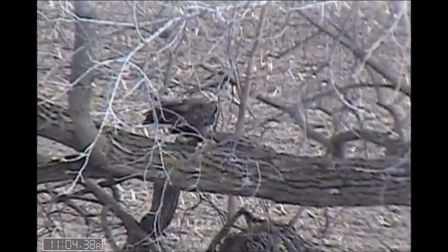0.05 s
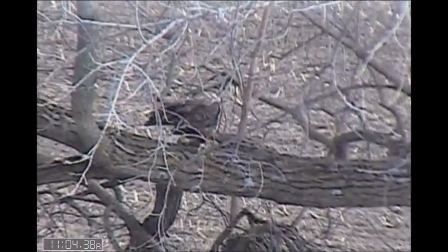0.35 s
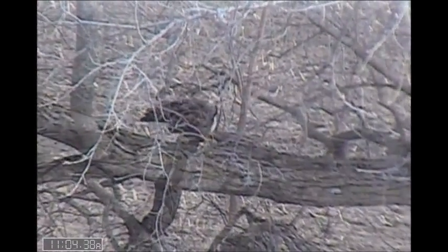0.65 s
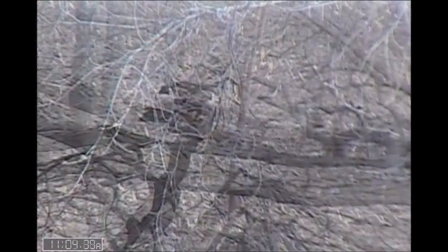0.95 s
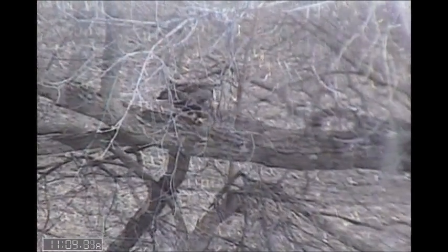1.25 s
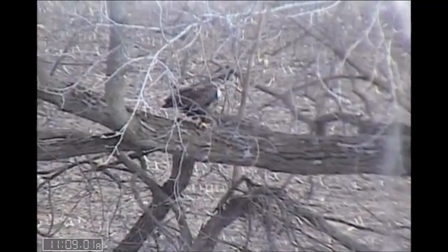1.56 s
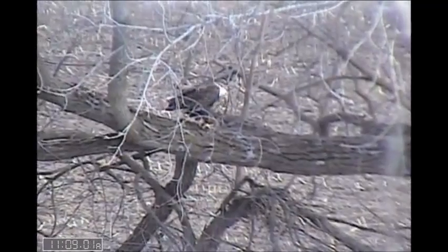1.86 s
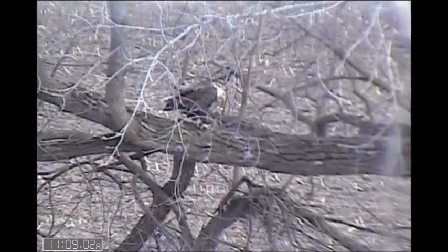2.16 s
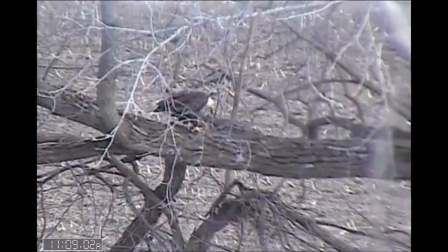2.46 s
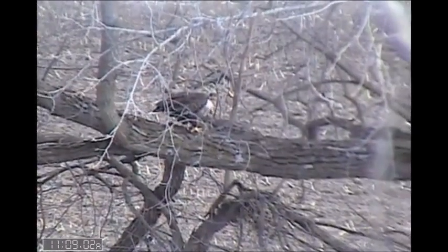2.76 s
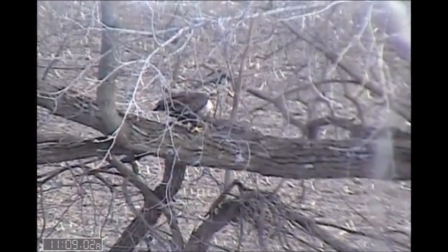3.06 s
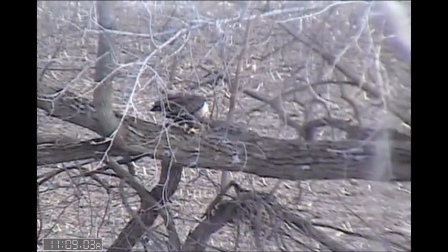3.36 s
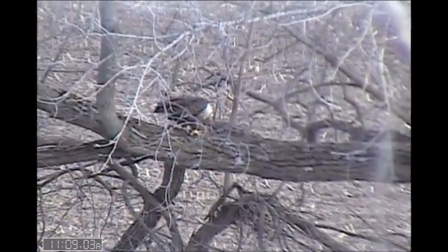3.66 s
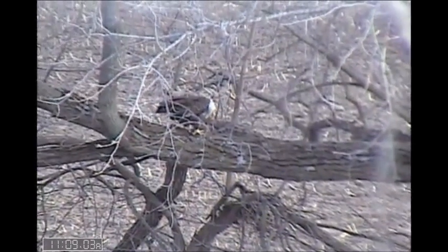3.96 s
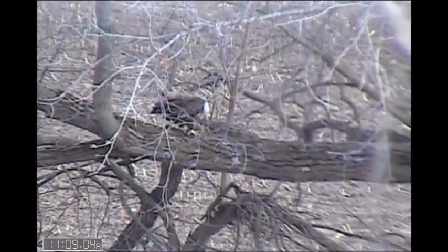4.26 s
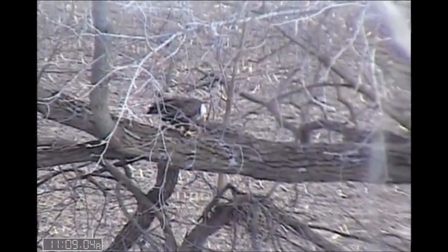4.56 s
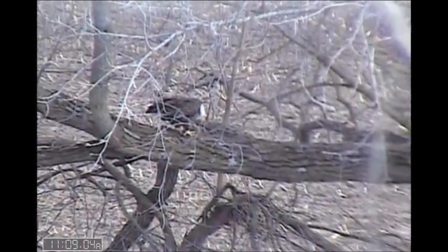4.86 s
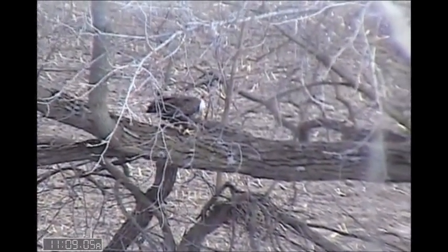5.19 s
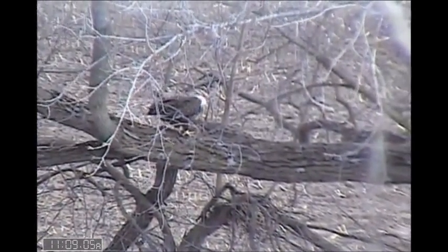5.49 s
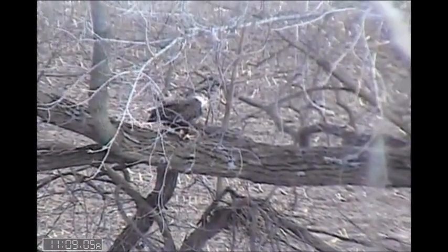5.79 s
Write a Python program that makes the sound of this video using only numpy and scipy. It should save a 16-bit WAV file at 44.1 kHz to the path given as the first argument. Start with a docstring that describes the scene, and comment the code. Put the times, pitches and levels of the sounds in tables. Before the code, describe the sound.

Wind rushes dully past a camera microphone in bare woods, swelling and easing in gusts over a low rumble. Tape hiss and two thin, very high whistles lie underneath and drop in level early on. Dry woody ticks and a few soft thumps come at odd moments. In the second half the wind briefly sags and sputters between gusts, while a fine crackle gathers on the left.

```python
"""Wind in bare woods

Wind rushes dully past a camcorder's microphone: each gust swells its roar and thins the low rush beneath. Tape
hiss and two thin, high whistles lie under it and step down early on. Dry ticks come at odd moments. Later the
wind sputters between gusts and a fine crackle gathers on the left."""
import sys
import numpy as np
from scipy import signal
from scipy.fft import rfft, irfft, next_fast_len
from scipy.io import wavfile
from scipy.ndimage import uniform_filter1d

SR = 44100
rng = np.random.default_rng(int(sys.argv[2]) if len(sys.argv) > 2 else 0)


def materialize(psi):
    """Save the field psi as 16-bit PCM at rate SR to the path in sys.argv[1].

    A 1-D psi becomes a single channel; in a 2-D psi each row is a channel.
    """
    bounded = np.clip(np.atleast_2d(psi).T, -1, 1)
    quanta = np.round(bounded * 32767).astype(np.int16)
    wavfile.write(sys.argv[1], SR, quanta)


N = 265909
TIME_S = np.arange(N) / SR


def amp(db):
    """Turn decibels into a gain to multiply by."""
    return 10 ** (np.asarray(db) / 20)


def over_hz(rows, hz):
    """Read each column of a table at the given pitches, blending between rows."""
    row_hz, *columns = np.transpose(rows)
    return [np.interp(np.log(hz + 1), np.log(row_hz + 1), column) for column in columns]


def over_time(rows, t):
    """Read each column of a table at the given times, blending between rows."""
    row_s, *columns = np.transpose(rows)
    return [np.interp(t, row_s, column) for column in columns]


def wander(rate_hz, stride=32):
    """A smooth random wobble of about size 1, no faster than about rate_hz."""
    coarse = np.arange(next_fast_len(N // stride + 2)) * stride
    hz = np.fft.rfftfreq(len(coarse), stride / SR)
    spectrum = rfft(rng.standard_normal(len(coarse)))
    wobble = irfft(spectrum / (1 + (hz / rate_hz) ** 4), len(coarse))
    return np.interp(np.arange(N), coarse, wobble / wobble.std())


def stereo_noise(loudness_db, stereo):
    """Noise shaped by loudness_db(hz, t) and spread between left and right by a stereo table."""
    frames = dict(fs=SR, nperseg=1024, noverlap=768)
    white = rng.standard_normal((2, N)) * np.sqrt(SR / 2)
    hz, t, (shared, separate) = signal.stft(white, **frames)
    balance_db, likeness, lead_rad = over_hz(stereo, hz[:, None])
    left = shared * amp(balance_db)
    right = (likeness * shared + np.sqrt(1 - likeness ** 2) * separate) * np.exp(1j * lead_rad)
    pair = np.array([left, right]) / np.sqrt((1 + amp(balance_db) ** 2) / 2)
    return signal.istft(pair * amp(loudness_db(hz[:, None], t)), **frames)[1][:, :N]


def early(step_s=1.777, fade_s=0.023):
    """1 before the hiss, whistles and crackle step down, 0 afterwards."""
    return np.clip(.5 + (step_s - TIME_S) / fade_s, 0, 1)


def snap(clicks, relax_hz, soft_hz):
    """Turn each click into a sudden jump that quickly dies away."""
    hold, soft = np.exp(-2 * np.pi * np.array([relax_hz, soft_hz]) / SR)
    jumps = signal.lfilter([1], [1, -hold], clicks)
    return signal.lfilter([1 - soft], [1, -soft], jumps)


def soft_pulse(clicks, hz, half_s, balance_db):
    """Turn each click into a soft, low pulse a few cycles long."""
    t = np.arange(-600, 601) / SR
    shape = np.exp(-(t / half_s) ** 2) * np.cos(2 * np.pi * hz * t)
    return np.outer(amp([balance_db / 2, -balance_db / 2]), signal.oaconvolve(clicks, shape, "same"))


# The tone of the hiss: pitch_hz, level_db
HISS_TONE = [(300, -81), (1500, -85.5), (2500, -91.5), (4000, -88), (7000, -88), (10500, -88), (12500, -90),
             (15500, -95)]
# Where the hiss sits: pitch_hz, left_over_right_db, likeness (0 to 1), right_lead_rad
HISS_STEREO = [(1500, 14.5, 0, 0.9), (2460, 12, 0, 3.6), (3930, 6.5, 0.97, 4.31), (7000, 4.5, 0.6, 3.4),
               (15000, 3.5, 0.77, 3)]


def tape_hiss(level_db=-0.37, early_db=7, flicker_db=1.25):
    """Tape makes a fine hiss that flickers slightly and is louder at first."""
    noise = stereo_noise(lambda hz, t: over_hz(HISS_TONE, hz)[0], HISS_STEREO)
    return noise * amp(level_db + early_db * early() + flicker_db * wander(24))


# The lower whistle, then the upper: early_boost_db, left_over_right_db, flutter_db, throb_db
WHISTLE_TRAITS = [(4, 8, 2, 3), (7.5, 9, 3.5, 3)]
# Their slow swells: time_s, lower_db, upper_db
WHISTLE_SWELLS = [(0, -65, -65.5), (.35, -58.5, -63.5), (.6, -64, -64.5), (.9, -57, -64.5),
                  (1.3, -55.5, -65.5), (1.7, -60, -61), (2.05, -56, -61.5), (2.5, -60, -62),
                  (3.05, -57, -63), (3.55, -64, -72), (4.15, -59, -68), (4.5, -64, -69.5), (5.0, -62, -65),
                  (5.4, -62, -63), (6.03, -66, -68)]


def whistles(pitches_hz=(11181, 15734), drift_hz=1.0, throb_hz=10):
    """Two thin tones swell, flutter and throb; the right side is the left one's wave upside down."""
    out = np.zeros((2, N))
    throb = np.sin(2 * np.pi * np.cumsum(throb_hz + wander(5.6)) / SR)
    for hz, swell_db, traits in zip(pitches_hz, over_time(WHISTLE_SWELLS, TIME_S), WHISTLE_TRAITS):
        early_db, balance_db, flutter_db, throb_db = traits
        tone = np.sqrt(2) * np.sin(2 * np.pi * np.cumsum(hz + drift_hz * wander(8)) / SR)
        tone *= amp(swell_db + early_db * early() + flutter_db * wander(45) + throb_db * throb)
        out += np.outer([amp(balance_db / 2), -amp(-balance_db / 2)], tone)
    return out


# Flurries of crackle: middle_s, half_length_s, peak_pops_per_s
CRACKLE_FLURRIES = [(3.28, 0.054, 330), (3.445, 0.054, 850), (3.6, 0.087, 520), (3.733, 0.05, 430),
                    (4.451, 0.33, 260), (4.582, 0.058, 2000), (4.722, 0.024, 1200), (5.064, 0.032, 450),
                    (5.194, 0.04, 750), (5.29, 0.027, 650), (5.5, 0.068, 950), (5.877, 0.22, 950)]


def crackle(level_db=-30, early_db=7, spread_db=3, right_db=-17.5, stray_per_s=40):
    """Tiny dry pops, mostly on the left: a few stray ones throughout, and flurries later on."""
    chance, size, sign = rng.random((3, N))
    flurries = sum(rate * np.exp(-((TIME_S - s) / half) ** 2) for s, half, rate in CRACKLE_FLURRIES)
    pops_per_s = (stray_per_s + flurries) * amp(3 * wander(25))  # the pops come in clumps
    size_db = spread_db * np.minimum(-np.log(1 - size), 3)  # most are small
    clicks = (chance < pops_per_s / SR) * np.sign(sign - .5)
    clicks *= amp(level_db + early_db * early() + size_db)
    pops = signal.lfilter(*signal.butter(2, 8000, fs=SR), snap(clicks, relax_hz=2880, soft_hz=7300))
    return np.outer([1, -amp(right_db)], pops)


# The notes of the knock: pitch_hz, level_db, ring_s (time to fade by 60 dB)
KNOCK_NOTES = [(710, -10, 0.026), (873, -20, 0.025), (1100, -34.5, 0.024)]
# The single ticks: start_s, level_db, left_over_right_db, extra_knock_db
SINGLE_TICKS = [(0.102, -29.5, 22, -10), (0.1612, -25, -1, -5), (0.2358, -15, -9, -4), (0.271, -21, -4, 1),
                (0.3455, -19, 2, -8), (0.353, -24, 4, -4), (0.371, -20.5, -4, -5), (0.486, -25, 5, 5),
                (0.4928, -25, 6, 8), (0.6555, -32.5, 6, 16), (0.66, -30, 4, 14), (0.8347, -25, -8, 5),
                (1.0057, -23, -4, -2), (1.136, -30, -18, -3), (1.6259, -24, -12, -2), (1.6404, -23.5, -9, 2),
                (1.841, -21.5, 2, 4), (2.158, -33.5, 20, -6), (2.3476, -32, 8, 8), (2.35, -21.5, -15, -4),
                (2.544, -34, 19, -3), (2.8792, -20.5, -5, 5), (2.8819, -24.5, -9, -15),
                (3.2058, -24.5, 3, 7), (3.211, -22.5, 5, -6), (3.452, -36, 17, 4), (3.4779, -32, 22, -3),
                (3.5807, -19, -9, -5), (3.591, -27, 15, -1), (3.939, -33, 16, -7), (4.264, -35, 16, -1),
                (4.3015, -34, 10, 2), (4.311, -31.5, -9, -2), (4.3242, -34, 13, -3), (4.341, -36, 14, 0),
                (4.591, -30, 17, -1), (4.64, -20.5, 7, -5), (4.6733, -33, 14, -2), (4.679, -31, 14, 1),
                (4.6904, -29, 12, -1), (4.719, -35, 13, 3), (5.077, -32.5, 14, 7), (5.1093, -29.5, 19, -8),
                (5.189, -26, -2, 0), (5.273, -38, 15, -3), (5.309, -35, 15, -2), (5.424, -35, 16, -3),
                (5.4674, -33, 20, 8.5), (5.4765, -25, -18, 0), (5.482, -25, -11, -5), (5.764, -32.5, 18, -7),
                (5.7915, -33, 14, -3)]


def ticks(boost_db=3, knock_db=4.5, grit_db=-22, grit_s=0.0025, thud_db=-19, samples=1600):
    """Dry ticks lean to either side, each with a trace of grit, a short knock and a faint thud."""
    clicks, knocks = np.zeros((2, 2, N + samples))
    t = np.arange(samples) / SR
    ring = sum(amp(db - 60 * t / ring_s) * np.sin(2 * np.pi * hz * t) for hz, db, ring_s in KNOCK_NOTES)
    for start_s, level_db, balance_db, extra_knock_db in SINGLE_TICKS:
        start = round(start_s * SR)
        sides = amp(boost_db + level_db + np.array([balance_db, -balance_db]) / 2)
        burst = (t == 0) + amp(grit_db) * np.exp(-t / grit_s) * rng.standard_normal(samples)
        clicks[:, start:start + samples] += np.outer(sides, burst)
        knocks[:, start:start + samples] += np.outer(sides, amp(knock_db + extra_knock_db) * ring)
    thud = amp(thud_db) * snap(clicks, relax_hz=200, soft_hz=1160)
    return (snap(clicks, relax_hz=320, soft_hz=12200) + thud + knocks)[:, :N]


# Short, soft thumps: time_s, peak_db
SOFT_THUMPS = [(0.585, -9), (0.6775, -3.5), (0.964, -12), (1.091, -17), (1.245, -12), (1.278, -11),
               (2.102, -11), (2.595, -10.5), (3.173, -14), (4.285, -11.5), (4.931, -14), (5.285, -14),
               (5.416, -9)]


def soft_thumps():
    """A few short, soft thumps stand out of the roar."""
    clicks = np.zeros(N)
    for time_s, peak_db in SOFT_THUMPS:
        clicks[round(time_s * SR)] = amp(peak_db)
    return soft_pulse(clicks, hz=520, half_s=0.0017, balance_db=3)


# Moments when the wind sags: middle_s, depth_db, half_length_s
WIND_SAGS = [(3.52, 4.5, 0.049), (4.319, 22, 0.018), (4.387, 7, 0.015), (4.658, 12, 0.039),
             (4.776, 9, 0.011), (5.703, 11.5, 0.019)]


def sags():
    """Brief dips in the smooth rush of the wind, in decibels."""
    return -sum(db * np.exp(-((TIME_S - s) / half) ** 2) for s, db, half in WIND_SAGS)


def sputter(sag_db, level_db=-12.5, puffs_per_s=85, edge_db=-36):
    """Where the wind sags it breaks into uneven low puffs on the right, with crisp edges on the left."""
    count = np.cumsum(puffs_per_s * np.exp(.35 * wander(60))) / SR
    pushes = np.diff(np.floor(count), prepend=0)  # one push at each whole number
    pushes *= rng.choice([-1, 1], N) * amp(0.2 * rng.standard_normal(N))
    pushes *= np.sqrt(np.clip(1 - amp(sag_db) ** 2, 0, 1))  # deeper sags puff harder
    puffs = soft_pulse(pushes, hz=312, half_s=0.0018, balance_db=-8.5)
    edges = np.outer([1, -amp(-12)], snap(pushes, relax_hz=900, soft_hz=7000))
    return amp(level_db) * puffs + amp(edge_db) * edges


# Hollow moans within the roar: middle_s, half_length_s, pitch_hz, half_width_hz, level_db
WIND_MOANS = [(2.1, 0.14, 416, 20, -40.5), (2.06, 0.25, 740, 63, -47), (4.06, 0.16, 494, 42, -39.5),
              (4.197, 0.084, 648, 46, -42), (5.1, 0.037, 485, 37, -35.5)]


def moans(hz, t, rise_hz_per_s=39):
    """Breathy notes sound for a moment and glide slightly upward."""
    return sum(amp(db) * np.exp(-((t - s) / half) ** 2)
               * np.exp(-((hz - pitch - rise_hz_per_s * (t - s)) / width) ** 2)
               for s, half, pitch, width, db in WIND_MOANS)


# The tone of the buffeting: pitch_hz, relative_db
BUFFET_TONE = [(10, -34), (25, -43), (45, -71), (70, -23.5), (110, -22), (150, -20.5), (230, -18.5),
               (1000, -100)]
# How it rises and falls: time_s, relative_db
BUFFET_SWELLS = [(0, 3.5), (.2, 0.5), (.4, 2.5), (1.4, 5), (1.68, 3), (1.8, -3.5), (2.25, -2.5),
                 (2.45, 0.5), (2.7, -2), (3.1, -1), (3.5, 2.5), (3.95, 1.5), (4.13, -3), (4.35, -2),
                 (4.58, 6), (5.0, -2.5), (5.3, 1), (6.03, 4)]


def buffeting(hz, t, level_db=-31, lump_db=0.5):
    """Swirls of air beat against the housing and make a lumpy rumble."""
    lumps = np.interp(t, TIME_S, wander(6))
    swell_db = over_time(BUFFET_SWELLS, t)[0]
    return amp(level_db + swell_db + lump_db * lumps + over_hz(BUFFET_TONE, hz)[0])


# The tone of the low rush: pitch_hz, relative_db
RUSH_TONE = [(60, -72), (130, -37), (190, -28.5), (280, -23.5), (370, -24), (480, -31.5), (1200, -77.5)]
# How it rises and falls apart from the gusts: time_s, relative_db
RUSH_SWELLS = [(0, 5.5), (.2, 0), (.35, 7.5), (.8, 6.5), (1.1, 4.5), (1.5, 4), (1.72, 5), (1.85, 0),
               (2.6, 0.5), (3.5, -2.2), (3.95, -1), (4.2, -3.5), (4.6, -1.5), (5.7, -0.5), (6.03, 4)]


def low_rush(hz, t, gust_db, level_db=-24, thinning=0.38):
    """A hollow rush under the roar, which each gust thins."""
    swell_db = over_time(RUSH_SWELLS, t)[0]
    return amp(level_db - thinning * gust_db + swell_db + over_hz(RUSH_TONE, hz)[0])


# The tone of the roar when its upper edge is at 875 Hz: pitch_hz, relative_db
ROAR_TONE = [(150, -69), (330, -29.5), (440, -27), (540, -24), (640, -25), (780, -34), (950, -43.5),
             (1200, -53.5), (1600, -66), (3000, -88), (8000, -107)]


def roar(hz, t, gust_db, level_db=-24, swelling=0.84, edge_hz=830.6, sink_hz_per_s=5.4, blotch_db=0.32):
    """The roar swells with each gust and darkens as its upper edge slowly sinks."""
    tone_db = over_hz(ROAR_TONE, hz * 875 / (edge_hz - sink_hz_per_s * t))[0]
    specks = rng.standard_normal((len(hz), len(t)))
    blotches = uniform_filter1d(uniform_filter1d(specks, 3, 0), 16, 1)  # smeared over pitch and time
    return amp(level_db + swelling * gust_db + blotch_db * blotches / blotches.std() + tone_db)


# The gusts, compared with the usual wind: time_s, strength_db
GUSTS = [(0, -5), (0.2, -7.5), (0.29, 5.5), (0.48, 4.5), (0.67, 5), (0.88, 3.5), (1.05, 6), (1.4, 4),
         (1.53, -1), (1.7, 2.5), (2.08, 3), (2.55, 1.7), (2.78, 2.5), (3.19, 4.5), (3.35, -1), (3.52, 0),
         (3.85, -4), (3.96, 2), (4.285, -0.5), (4.32, -0.5), (4.48, 1.5), (4.75, -3), (4.98, 2.5),
         (5.13, 2.9), (5.41, 3.5), (5.48, -2.5), (5.65, 4.5), (5.75, -2), (6.03, -2)]
# Where the wind sits: pitch_hz, left_over_right_db, likeness (0 to 1), right_lead_rad
WIND_STEREO = [(22, -5.3, .25, -3.6), (45, -7.5, .4, -2.9), (70, -7.4, .85, -2.4), (110, -8.9, .88, -1.9),
               (180, -10, .89, -.9), (280, -7, .95, 0), (400, -2.8, .965, .4), (540, .7, .97, .5),
               (780, 6.3, .9, .5), (950, 9, .75, .8), (1400, 9, .55, 1.1)]


def wind(flutter_db=0.73, flutter_hz=50):
    """Air rushes past the microphone: one noise, shaped by the four parts above."""
    def loudness_db(hz, t):
        """Add up the power of the parts at each pitch and time."""
        gust_db = over_time(GUSTS, t)[0]
        parts = buffeting(hz, t), roar(hz, t, gust_db), low_rush(hz, t, gust_db), moans(hz, t)
        return 10 * np.log10(sum(part ** 2 for part in parts))
    noise = stereo_noise(loudness_db, WIND_STEREO)
    return noise * amp(flutter_db * wander(flutter_hz))  # small swirls shake it all


def scene():
    """The wind sags into a sputter, hiss and whistles dip too; thumps, ticks and crackle lie on top."""
    sag_db = sags()
    background = tape_hiss() * amp(0.27 * sag_db) + whistles() * amp(0.6 * sag_db)
    return background + wind() * amp(sag_db) + sputter(sag_db) + soft_thumps() + ticks() + crackle()


def record(dry, bottom_hz=15, top_hz=15950):
    """The recorder drops the very deepest bass and cuts off the highest treble steeply."""
    dry = signal.lfilter(*signal.butter(1, bottom_hz, "high", fs=SR), dry)
    treble_cut = signal.firwin(1023, top_hz, window=("kaiser", 9), fs=SR)
    return signal.oaconvolve(dry, treble_cut[None], "same")


dry = scene()
out = record(dry)
materialize(out)
```